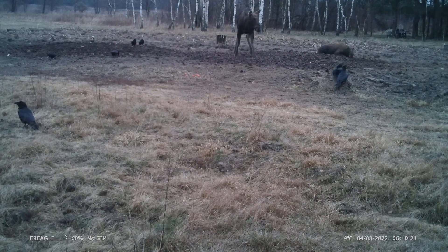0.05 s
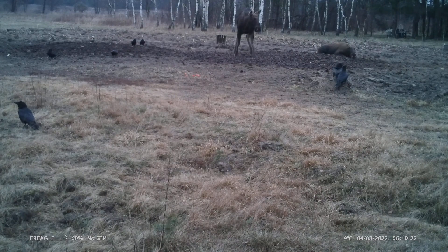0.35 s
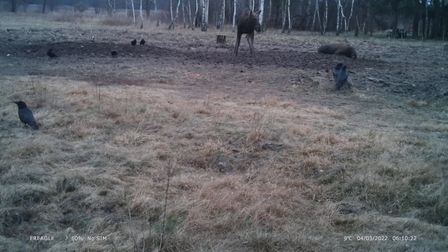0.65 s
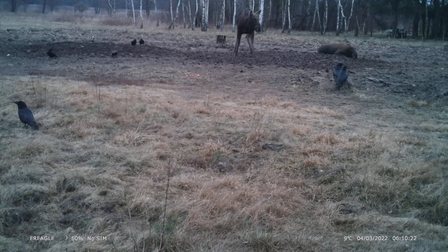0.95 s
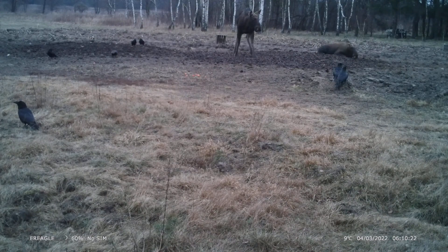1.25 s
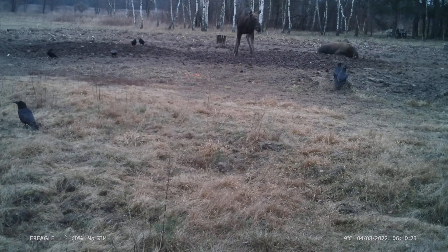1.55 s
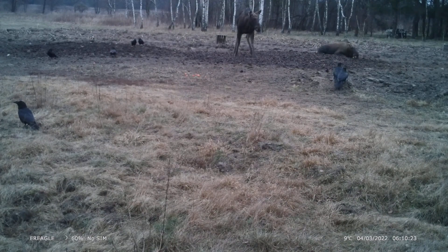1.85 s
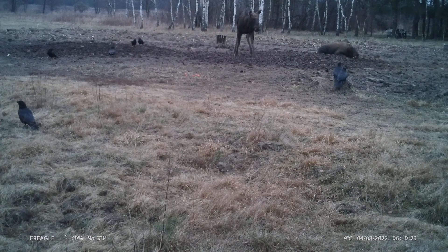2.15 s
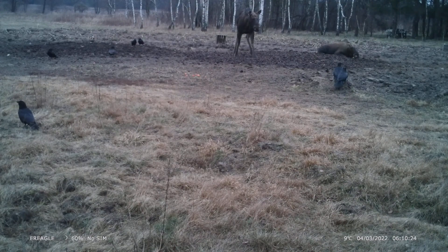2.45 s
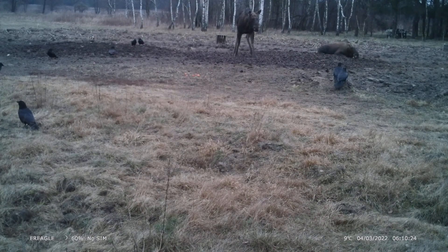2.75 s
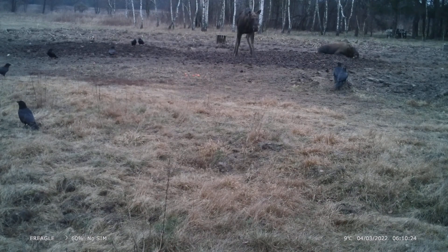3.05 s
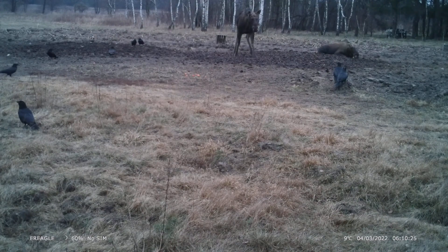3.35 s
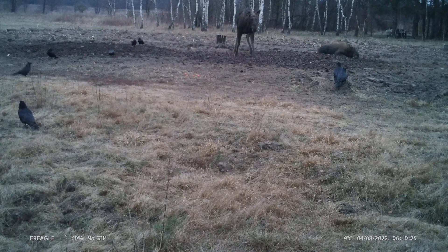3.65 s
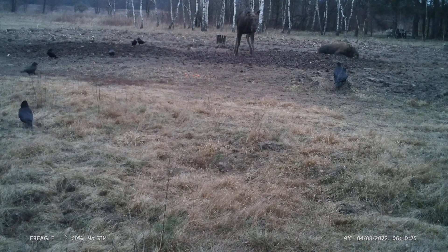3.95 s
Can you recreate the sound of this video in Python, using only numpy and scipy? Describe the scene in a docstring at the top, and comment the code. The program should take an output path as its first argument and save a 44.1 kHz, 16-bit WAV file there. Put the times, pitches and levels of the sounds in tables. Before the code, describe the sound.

In a grassy clearing beside woods, faint wind rumbles under a steady hiss. Then a raven gives four short, rasping croaks, evenly spaced and lightly echoing, before only the quiet background remains.

```python
"""A raven gives four short, harsh croaks in a grassy clearing. Each opens with a sharp snap of the
syrinx, the bird's voice box, then rattles in bursts about 50 times a second. Every burst is a few
pulses that sag in pitch. Throat and beak colour them, and the recorder's housing rings near 975 Hz.
The edge of the wood echoes faintly. Beneath lie a low wind rumble, a steady hiss, three tiny ticks
and a thin, far whistle."""
import sys
import numpy as np
from scipy import signal
from scipy.fft import rfft, irfft
from scipy.io import wavfile
from scipy.ndimage import uniform_filter1d

SR = 44100
rng = np.random.default_rng(int(sys.argv[2]) if len(sys.argv) > 2 else 0)


def to_wav(s):
    """Save 16-bit WAV."""
    ch = np.atleast_2d(s).T  # columns
    pcm = np.round(np.clip(ch, -1, 1) * 32767)  # PCM
    wavfile.write(sys.argv[1], SR, pcm.astype(np.int16))


N = 176400  # 4 seconds

# One row per croak: (start [s], relative level [dB], extra delay of bursts 3 to 6 [s],
# level change of the last burst [dB], pitch shift [Hz])
CROAKS = [(1.558, -1, 0, -10, 11.5), (1.8953, -0.96, 0.0016, -4, -1), (2.2510, 0, 0.0024, -3, -3.5),
          (2.6115, 0, 0.0017, -1, 0.5)]
def raven(t, gain_db=-38.5, croak_samples=7200):
    """The raven croaks four times, each a little differently."""
    out = np.zeros(N)
    for start, db, lag, last_db, shift_hz in CROAKS:
        first = int((start - .01) * SR)  # begin just ahead of the snap
        span = slice(first, first + croak_samples)
        out[span] += amp(gain_db + db) * croak(t[span] - start, lag, last_db, shift_hz)
    return out


# The six bursts of a croak: (delay [s], starting pitch [Hz], rise [s], hold [s], fade [dB/s],
# strength [dB], treble tilt [dB/octave])
BURSTS = [(0, 349.5, 0.0006, 0.0046, 500, -9.5, 4.5), (.0177, 465.4, 0.0016, 0.01, 1698, 4.5, 2.5),
          (.0373, 464.5, 0.0012, 0.013, 900, 2, 4), (.0573, 471.6, .001, 0.0082, 400, 5.5, 0.5),
          (.0773, 470, .001, .011, 448, 1.5, 1), (.1055, 313.5, 0.0006, 0.0057, 1500, -6.5, -0.5)]
def croak(t, lag, last_db, shift_hz, length_s=.122, snap_db=35):
    """The syrinx snaps shut, then rattles in a chain of bursts."""
    starts = [row[0] + lag * (k > 1) for k, row in enumerate(BURSTS)] + [length_s]
    out = amp(snap_db) * croak_colour(np.sinc(t * SR), tilt_db=6.5)
    for k, (_, hz, rise, hold, fade, db, tilt_db) in enumerate(BURSTS):
        if k == len(BURSTS) - 1:
            db += last_db
        pulses = burst(t - starts[k], starts[k + 1] - starts[k], hz + shift_hz, rise, hold, fade, db)
        out += croak_colour(pulses, tilt_db)
    return -out


def burst(t, length, start_hz, rise, hold, fade, db, sag_hz_per_s=5300):
    """The syrinx starts to vibrate, holds, collapses and fades while its pitch sags."""
    noise = rng.standard_normal((2, len(t)))
    pitch_wobble, level_wobble = unit(uniform_filter1d(noise, int(.002 * SR)))  # 2 ms wobbles
    hz = np.clip(start_hz - sag_hz_per_s * t, start_hz / 2, start_hz) * (1 + .013 * pitch_wobble)
    cycles = np.cumsum(hz) / SR
    cycles -= np.interp(0, t, cycles)  # count from the start of the burst
    collapse_db = 10 * soft_step((t - hold) / .001)
    fade_db = fade * np.maximum(t - hold, 0)
    strength = soft_step(t / rise + .5) * amp(db + 1.1 * level_wobble - collapse_db - fade_db)
    ending = soft_step((length - t) / .0008 - 2)  # make way for the next burst
    return ending * (syrinx_tone(cycles, strength) + rasp(cycles, hz, strength))


# Harmonics (multiples of the pitch) 1, 2, 3, 4, then all higher ones. The first and fourth linger:
# (relative level [dB], how steeply it follows the strength [exponent])
HARMONICS = [(-1, 0.28), (.5, 1.16), (-0.5, 0.93), (-2.5, 0.33), (-3, 0.73)]
def syrinx_tone(cycles, strength, count=26, smear_rad=.118):
    """Harmonics add up to pulses. A soft closure spreads each pulse, so the higher ones lag."""
    k = np.arange(1, count + 1)[:, None]
    level_db, steepness = np.array(HARMONICS).T[:, np.minimum(k, len(HARMONICS)) - 1]
    waves = np.cos(2 * np.pi * k * cycles - smear_rad * k ** 2)
    return np.sum(amp(level_db) * strength ** steepness * waves, axis=0)


# Tone colour of the rasp: (frequency [Hz], gain [dB])
RASP_COLOUR = [(600, -20), (1500, -9), (2100, 0), (6000, 0)]
def rasp(cycles, hz, strength, gain_db=7, fade_s=.001):
    """Each pulse lets out a short puff of noise."""
    since_pulse = (cycles % 1) / hz
    puffs = unit(np.exp(-since_pulse / fade_s) * rng.standard_normal(len(cycles)))
    return amp(gain_db) * strength * colour(puffs, RASP_COLOUR)


# Tone colour of the croak, from throat, beak and the recorder's housing: (frequency [Hz], gain [dB])
CROAK_COLOUR = [(150, -19.5), (310, -7), (400, -12), (470, -4.5), (620, -11.5), (790, -6), (885, -2.5),
                (975, .5), (1100, -2.5), (1340, -2), (1700, -2), (2050, -10.5), (2520, -5.5), (2800, -20.5),
                (3050, -21), (3250, -16), (3650, -13), (4100, -13.5), (4600, -18.5), (5250, -28),
                (5500, -34), (6000, -33.5), (7200, -39.5), (11000, -65)]
def croak_colour(x, tilt_db):
    """Throat and beak colour each pulse; the recorder's housing adds a narrow ring near 975 Hz."""
    hz = np.fft.rfftfreq(len(x), 1 / SR)
    octaves = np.log2(np.clip(hz, 700, 5000) / 1200)
    response = ringing(gains(CROAK_COLOUR, hz) * amp(tilt_db * octaves))
    return irfft(rfft(x) * response)


# Tone colour of the far echoes: (frequency [Hz], gain [dB])
ECHO_COLOUR = [(300, -0.5), (700, -7), (880, -5), (1010, 4), (1200, -11), (1650, -1), (2000, -9.5),
               (2600, 0), (3600, -2), (8000, 3)]
def clearing(x, echo_delay_s=.147):
    """Sound scatters off the ground, trails away over the field and comes back late from the trees."""
    t = np.arange(SR) / SR
    ground = reflections(np.exp(-t / .014) * np.minimum(t / .0011, 1))
    trees = reflections(np.clip((t - echo_delay_s) / .028, 0, 1) * np.exp(-t / .18))
    field = reflections(np.exp(-t / .23))
    near = amp(-11) * signal.fftconvolve(x, ground)[:N]
    far = signal.fftconvolve(x, amp(-20.5) * trees + amp(-27) * field)[:N]
    return x + near + colour(far, ECHO_COLOUR)


# Tone colour of the wind: (frequency [Hz], relative level [dB])
WIND_COLOUR = [(10, -5.5), (26, -1), (42, -6.5), (52, -8), (62, -8.5), (80, -19), (110, -24), (160, -28),
               (250, -33), (450, -36.5), (900, -38), (1600, -47.5), (5000, -58.5)]
# Slow rise and fall of its rumble: (time [s], level change [dB])
BREEZE = [(0, 2.5), (1.4, 1.5), (2.1, -0.5), (2.7, -3), (3.3, -1.5), (3.6, 3.5), (4, -4)]
def wind(t, gain_db=-48.5, gust_db=1.14, rumble_hz=100):
    """The wind's deepest part swells and sinks in small gusts."""
    gusts = unit(colour(rng.standard_normal(N), [(1, 0), (4, 0), (10, -40), (30, -120)]))
    swell_db = np.interp(t, *np.array(BREEZE).T) + gust_db * gusts
    air = unit(colour(rng.standard_normal(N), WIND_COLOUR))
    rumble = signal.sosfiltfilt(signal.butter(2, rumble_hz, fs=SR, output="sos"), air)
    return amp(gain_db) * (air + rumble * (amp(swell_db) - 1))


# Tone colour of the hiss: (frequency [Hz], relative level [dB])
HISS_COLOUR = [(100, 0), (1000, -0.34), (2000, 1), (4000, 0.015), (5500, 1), (8000, -0.53), (12000, -1.5),
               (16000, -1.9)]
def hiss(level_db=-64):
    """A soft, even hiss."""
    return amp(level_db) * unit(colour(rng.standard_normal(N), HISS_COLOUR))


# One row per tick: (time [s], frequency [Hz], half-width [Hz], half-length [s], level [dB])
TICKS = [(0.017, 6100, 1700, 0.0013, -51.5), (0.144, 6000, 2000, .004, -65),
         (1.277, 4600, 800, 0.002, -58.5)]
def ticks(t):
    """Tiny high ticks, perhaps small birds in the wood."""
    return sum(noise_blip(t, *tick) for tick in TICKS)


def whistle(t):
    """A far whistle: noise in so narrow a band that it sounds like a note."""
    return noise_blip(t, at_s=.26, hz=4570, half_width_hz=40, half_length_s=.22, db=-77.5)


def noise_blip(t, at_s, hz, half_width_hz, half_length_s, db):
    """Noise around one frequency swells and dies away."""
    bell = np.exp(-((np.fft.rfftfreq(N, 1 / SR) - hz) / half_width_hz) ** 2)
    band = unit(irfft(rfft(rng.standard_normal(N)) * bell, N))
    return amp(db) * band * np.exp(-((t - at_s) / half_length_s) ** 2)


def amp(db):
    """Turn decibels into a multiplier."""
    return 10 ** (np.asarray(db) / 20)


def unit(x):
    """Scale to an average power of 1."""
    return x / np.sqrt(np.mean(x ** 2))


def soft_step(x):
    """Glide from 0 to 1 as x passes zero."""
    return (1 + np.tanh(x)) / 2


def gains(points, hz):
    """Read a multiplier for each frequency from a tone colour table."""
    f, db = np.array(points).T
    return amp(np.interp(np.log(np.maximum(hz, 1)), np.log(f), db))


def colour(x, points):
    """Give a sound the tone colour of a table."""
    return irfft(rfft(x) * gains(points, np.fft.rfftfreq(len(x), 1 / SR)), len(x))


def ringing(gain):
    """A filter with these gains that rings only after a pulse, never before."""
    c = irfft(np.log(gain))
    c[1:len(c) // 2] *= 2
    c[len(c) // 2 + 1:] = 0
    return np.exp(rfft(c))


def reflections(shape):
    """Many random echoes that follow a loudness shape, with a total energy of 1."""
    echoes = rng.standard_normal(len(shape)) * shape
    return echoes / np.sqrt(np.sum(echoes ** 2))


def scene():
    """Mix the raven and the background into one channel."""
    t = np.arange(N) / SR
    return (clearing(raven(t)) + wind(t) + hiss() + ticks(t) + whistle(t))[None]


def record(dry, top_hz=15300):
    """Cut off the highest treble steeply."""
    return signal.sosfilt(signal.ellip(12, .1, 70, top_hz, fs=SR, output="sos"), dry)


dry = scene()
out = record(dry)
to_wav(out)
```